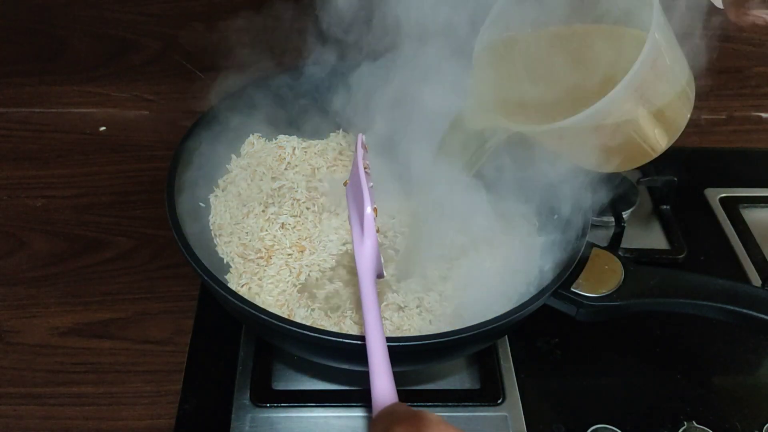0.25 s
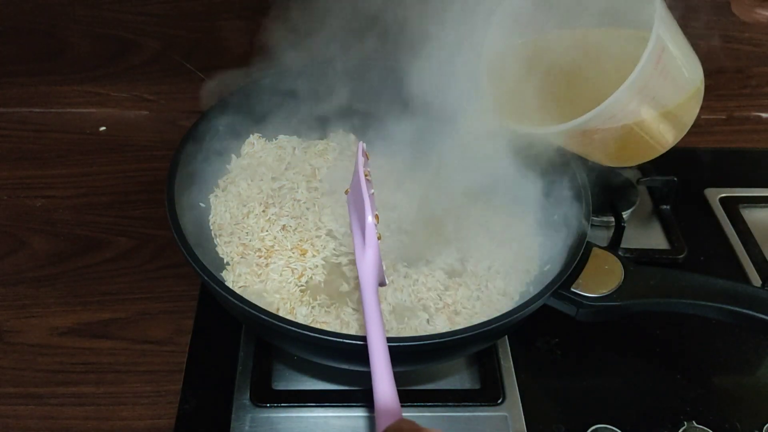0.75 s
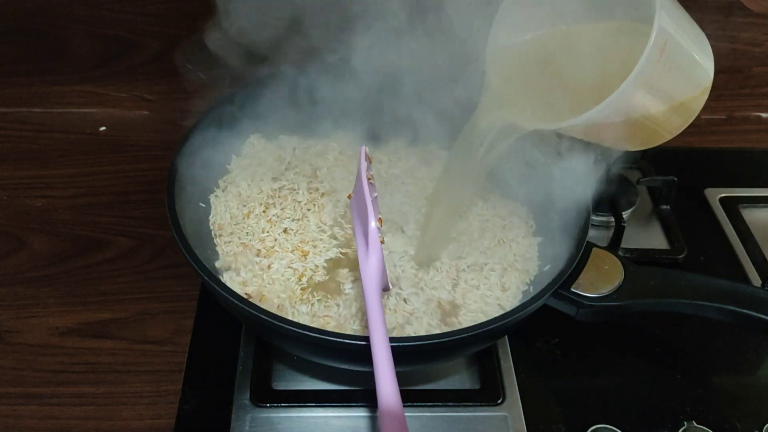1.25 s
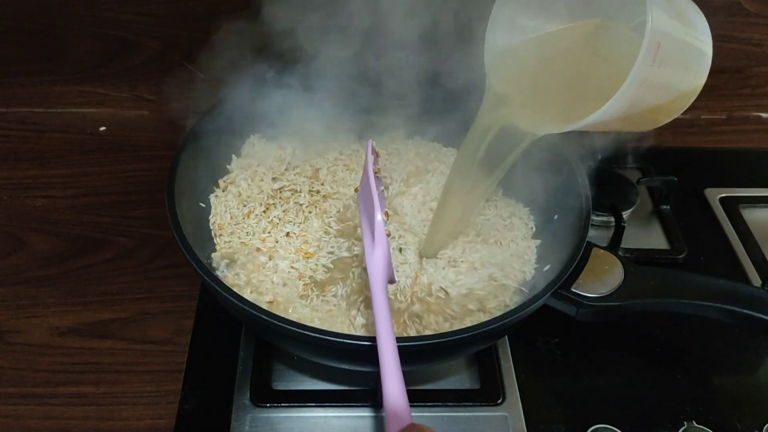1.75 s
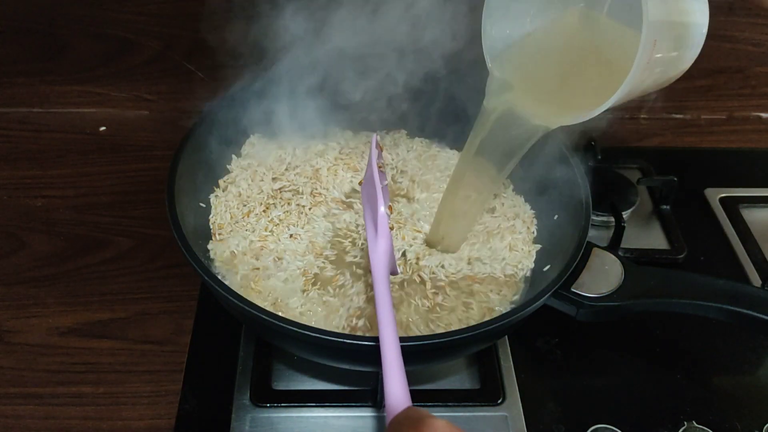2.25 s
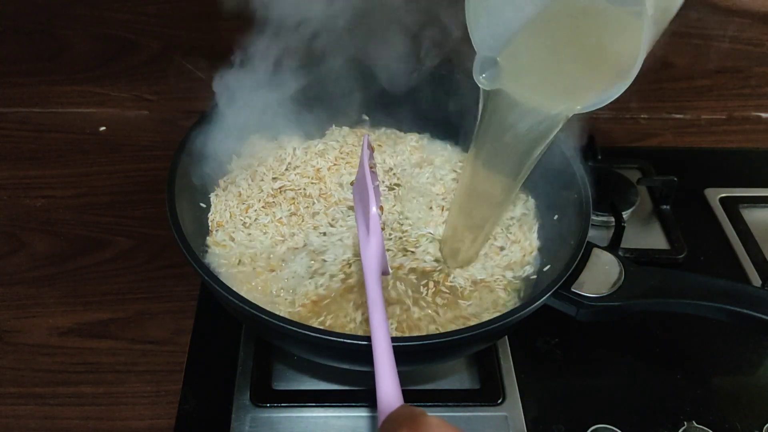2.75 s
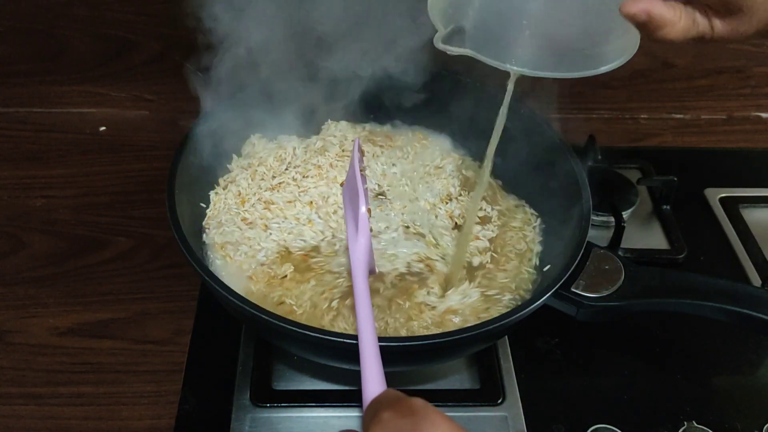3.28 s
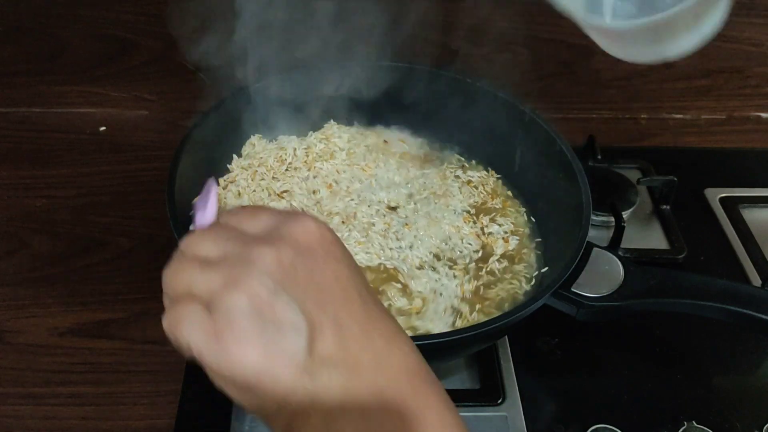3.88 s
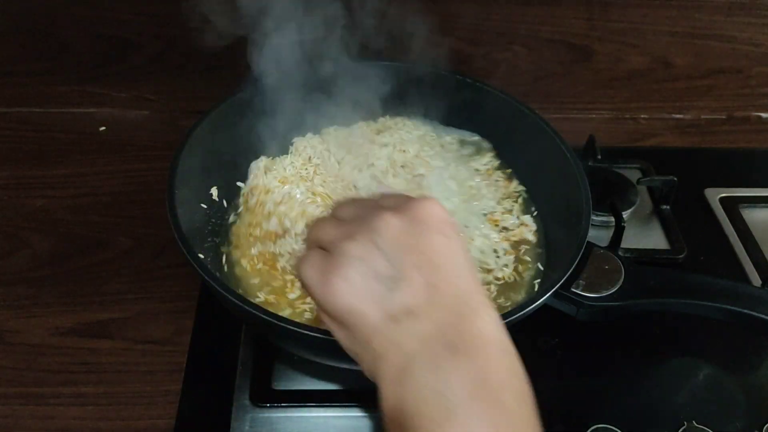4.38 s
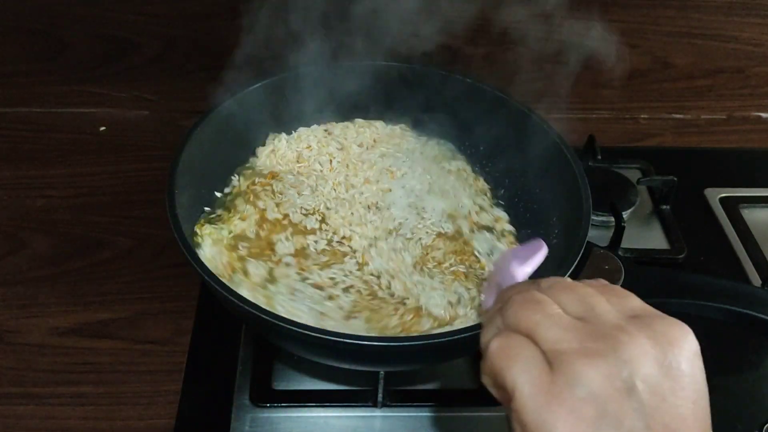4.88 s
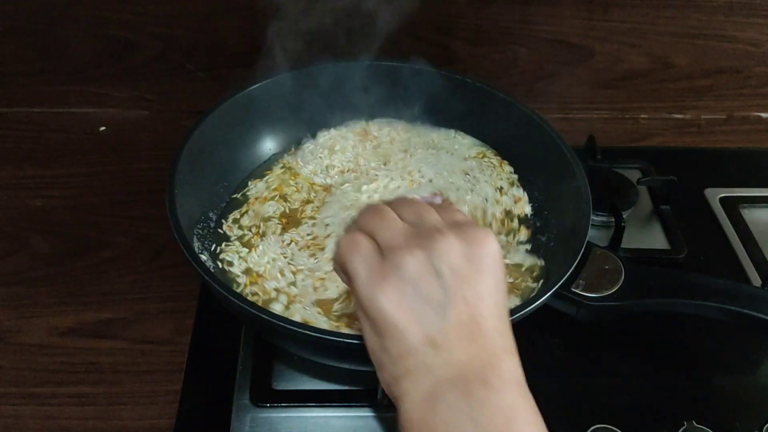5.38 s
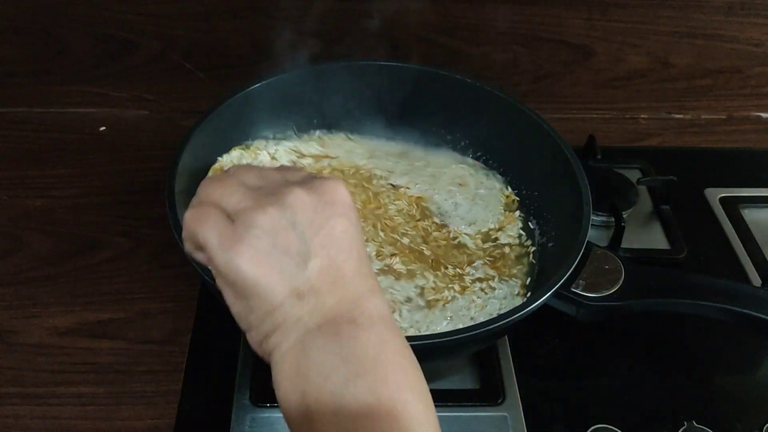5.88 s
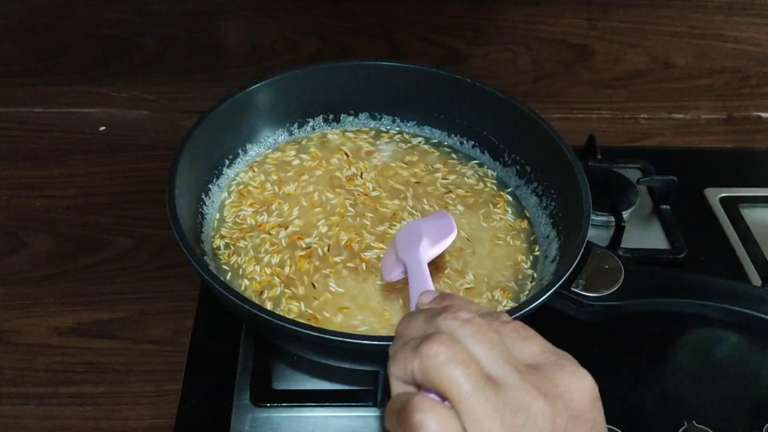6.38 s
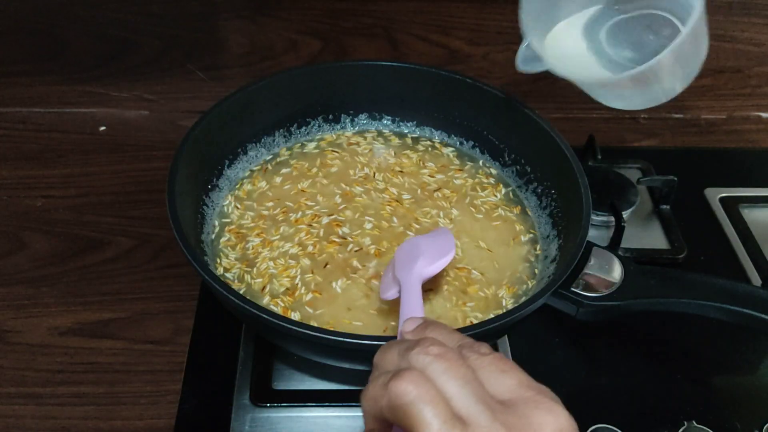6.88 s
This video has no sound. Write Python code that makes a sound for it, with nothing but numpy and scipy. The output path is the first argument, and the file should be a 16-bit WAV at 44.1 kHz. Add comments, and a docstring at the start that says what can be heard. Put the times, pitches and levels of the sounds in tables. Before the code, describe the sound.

Broth poured into a hot wok of rice hisses fiercely, thins to sharp spits and gurgles, then cuts abruptly to a quiet simmer.

```python
"""Broth runs into a hot wok of rice and oil: bursting steam bubbles, made of noise and crackle, ring the pan.
As the broth cools the metal, the hiss thins to single spits (short snaps of noise) and gurgles (rising tones).
Then time jumps to a quiet simmer: soft coloured noise with tiny ticks and a few pops.
A gas burner rumbles throughout, made of three narrow noises, with three soft low thuds.
One close microphone: both channels carry the same sound."""
import sys
import numpy as np
from scipy import signal
from scipy.fft import rfft, irfft
from scipy.io import wavfile
from scipy.ndimage import uniform_filter1d

SR = 44100
rng = np.random.default_rng(int(sys.argv[2]) if len(sys.argv) > 2 else 0)


def dump(signal):
    """Clip the signal to [-1, 1] and save it as 16-bit WAV at the path in sys.argv[1]."""
    limited = np.clip(np.atleast_2d(signal).T, -1, 1)
    pcm = np.round(limited * 32767).astype(np.int16)
    wavfile.write(sys.argv[1], SR, pcm)


N = 314433  # length in samples

# Strength of the sizzle over time: time_s, fine_fizz_db, coarse_over_fine_db
SIZZLE_LEVELS = [(0, -21.5, -2.5), (.7, -20.5, -4.5), (1.1, -22, -2.5), (1.6, -23.5, -3),
                 (3.0, -23.5, -1.5), (3.35, -25.5, 0.2), (4.1, -25, -2.5), (4.42, -24, -2),
                 (4.67, -24, -1.5), (4.85, -25.5, -1), (5.08, -24.5, -3), (5.2, -24, -4.5),
                 (5.5, -29.5, -2), (5.95, -30, -4), (6.08, -32.5, -2.5), (6.2, -33.5, -3.5), (6.3, -36, -1)]
# How deep the broth stands: time_s, depth (0 to 1)
BROTH_DEPTH = [(0, 0), (1.5, 0.1), (2.8, 0.25), (3.8, 0.43), (5, 0.73), (6.3, 1)]
# Colour of the bubbles through wok and microphone: pitch_hz, level_db (per Hz)
FIZZ_COLOUR = [(800, -28), (1250, -3), (1600, -2), (2300, -2.5), (2850, -0.6), (3200, -2.5), (3600, -8.5),
               (4500, -13.5), (5700, -13), (7100, -8), (9000, -6.5), (11050, -3.5), (11900, -7),
               (13400, -16.5), (15700, -23)]
# Ring of the nearly dry pan: pitch_hz, level_db (per Hz)
SHALLOW_PAN_COLOUR = [(120, -52), (200, -25), (322, -9.5), (398, -15), (438, -8), (466, 0), (512, -6.5),
                      (647, -2.5), (695, -6.5), (806, -8), (865, -13), (921, -10), (1030, -5.5),
                      (1200, -12.5), (1300, -8.5), (1690, -37), (2860, -120)]
# Body of the pan under broth: pitch_hz, level_db (per Hz)
DEEP_PAN_COLOUR = [(120, -54), (200, -15), (285, -11), (335, 4), (430, -5.5), (500, -4.5), (600, -2.5),
                   (648, -3), (695, -4.5), (730, 0.5), (860, -2.5), (920, -3.5), (1010, -2.5), (1280, -7.5),
                   (1700, -38), (2900, -100)]
# Pitches at which the wok rings: pitch_hz, width_hz, relative_level_db
WOK_MODES = [(270, 10, -9.5), (480, 9.4, -4), (660, 32, 5), (876, 12, 11), (1007, 33, 5.5), (1126, 35, 3.5),
             (1396, 15, 4.5), (1553, 32, 2.5), (1640, 25, 2), (1782, 61, 0.5), (1982, 47, 7),
             (2216, 50, 1.5), (2367, 46, 5), (2606, 61, -1), (2778, 50, 2.5), (2916, 34, -3),
             (3040, 46, -8.5)]
# Loud spits of oil and broth: start_s, level_db, coarse_over_fine_db
OIL_SPITS = [(3.6636, -12, -14), (3.797, -17, -5), (3.851, -12, -5), (4.611, -7.5, -10), (4.7704, -10, -17),
             (5.1726, -10, -15), (5.215, -15, -8), (5.284, -12, -14), (5.311, -15, -9), (5.417, -10, -13),
             (5.6526, -14, -13), (5.7513, -14, -13), (5.8345, -12, -9), (5.874, -15, -12),
             (5.8814, -10, -11), (5.898, -11, -13), (5.9273, -12, -16), (5.9754, -16, -11),
             (5.9894, -14, -21), (6.014, -18, -10), (6.1045, -18, -12), (6.1195, -9, -13),
             (6.1254, -18, -13), (6.1609, -16, -10), (6.1786, -19, -9), (6.1814, -18, -12),
             (6.1867, -16, -6), (6.1924, -16, -13), (6.2414, -20, -17), (6.2791, -20, -6),
             (6.2901, -17, -15), (6.3054, -19, -15), (6.351, -14, -8), (6.3536, -17, -18),
             (6.3633, -11, -24), (6.3646, -8, -10), (6.3660, -14, -24)]
# Gurgles under the spatula: start_s, start_pitch_hz, level_db, length_cycles
SPATULA_GURGLES = [(5.937, 575, -27, 16), (5.963, 660, -29.5, 14), (6.002, 820, -30, 14),
                   (6.012, 950, -35, 12), (6.088, 336, -37, 20), (6.125, 326, -36, 24)]
# Colour of the seething broth: pitch_hz, level_db (per Hz)
SIMMER_COLOUR = [(120, -30), (210, -22), (325, 2), (430, -9), (520, -10.5), (860, -11.5), (965, -10.5),
                 (1110, -13.5), (1900, -17), (2790, -19), (3300, -20), (4000, -29), (4900, -30),
                 (7000, -32.5), (10900, -29), (13000, -32), (15700, -38)]
# Pops of the simmer: start_s, level_db, coarse_over_fine_db, fade_s (time to fall 60 dB)
SIMMER_POPS = [(6.3904, -47, -10, .03), (6.4443, -41, -7, 0.065), (6.4921, -48, 0, .025),
               (6.6558, -47, -6, .05), (6.6754, -50, -11, .025), (6.7101, -41, -13, .04),
               (6.7224, -38, -13, 0.029), (6.757, -40, -11, .022), (6.8543, -53, -11, .03),
               (6.941, -32, -9, 0.022), (7.0265, -41, -14, 0.027), (7.0289, -37, 0, 0.1),
               (7.0813, -47, -6, .03), (7.1003, -49, -14, .02)]
# Rumble, drone and hum of the flame: pitch_hz, width_hz, level_db, wander_db, wanders_per_s
BURNER_PARTS = [(23, 21, -46, 2, 3.3), (66.4, 24, -56, 4, 4), (149.7, 28, -56, 2, 4)]
# Soft low thuds: start_s, start_pitch_hz, level_db, length_cycles
LOW_THUDS = [(.5, 77.5, -29, 7), (3.41, 68, -44, 10), (6.94, 67.6, -47, 22)]

JUMP_S = 6.3695  # when the hot wok gives way to the simmer
SPLIT_HZ = 4800  # border between coarse and fine fizz
# the pan's level at the hottest, and dB it loses for each dB the coarse fizz loses
PAN_DB, PAN_FOLLOWS = -33.5, 0.61
SNAP_RISE_S, SPIT_FADE_S = 0.00109, 0.013  # delay of each snap; time for a spit to fall 60 dB
SIMMER_DB = -55.5
# the hum sinks with the fizz by this share of its dB, and is weaker under the simmer
HUM_FOLLOWS, HUM_CALM_DB = 0.65, -9
DRONE_FULL_DB = 4  # gain of the drone under a full pan
TOP_HZ = 15750  # where the final treble cut begins


def sizzle():
    """Steam hiss and bursting bubbles take the fizz colour, while slower boiling rings the pan below."""
    fine_db, coarse_db = curves(SIZZLE_LEVELS)
    depth = np.clip(curves(BROTH_DEPTH)[0], 0, 1)
    total_db = fine_db + coarse_db
    pan_db = PAN_DB + PAN_FOLLOWS * (total_db - np.max(total_db))

    # the cooler the pan, the more the hiss breaks up into single bursts
    share = np.minimum(undb(-12.0 - 0.44 * (fine_db - fine_db.max())), 0.9)
    bursts = share * crackle(900.0, 8.7, 0.0085)
    hiss = np.sqrt(1 - share ** 2) * rng.standard_normal((2, N))
    steam = hiss[0] + bursts
    boil = hiss[1] + 0.3 * bursts

    fine, coarse = split(colour(steam, FIZZ_COLOUR))
    fine = unit(fine) * undb(0.19 * walk(12))
    coarse = unit(coarse + undb(-5.0) * ring(coarse, WOK_MODES))
    coarse = unit(coarse + undb(-14.0) * boiling())

    # shallow broth frees smaller bubbles, which brighten the upper edge
    coarse = coarse + 0.24 * (0.4 - depth) * ring(coarse, [(2880, 560, 0.0039)])
    # deep broth fills the lower treble and hollows the valley under it
    lower_treble = 0.4 * ring(fine, [(6460, 570, 0)])
    valley = 0.18 * ring(fine, [(4800, 1400, 0.0022)])
    fine = fine + (depth - 0.4) * (lower_treble - valley)
    coarse = coarse * undb(coarse_db + 0.55 * walk(9))

    boil = boil + undb(-6.0) * ring(boil, WOK_MODES)
    shallow = unit(colour(boil, SHALLOW_PAN_COLOUR, size=4096))
    deep = unit(colour(boil, DEEP_PAN_COLOUR, size=4096))
    pan = ((1 - depth) * shallow + depth * deep) * undb(pan_db + 1.3 * walk(15))
    return undb(fine_db) * (fine + coarse) + pan


def crackle(per_s, spread_db, fade_s):
    """Random bursting bubbles, mostly small, come in flurries; each leaves a short rustle."""
    flurry = undb(4.0 * walk(25))
    bursting = rng.random(N) < per_s * flurry / SR
    size = bursting * undb(spread_db * np.minimum(rng.exponential(size=N), 3.5))
    decay = np.exp(-np.log(1000) / (fade_s * SR))  # kept from one sample to the next
    tail = signal.lfilter([1], [1, -decay], size)
    clicks = size * np.sign(rng.standard_normal(N))
    return unit(clicks + 0.3 * tail * rng.standard_normal(N))


def boiling(count=1500):
    """Many ringing bubbles at random times sound across the middle pitches."""
    u = rng.random((count, 4)).T
    start_s = u[0] * N / SR
    pitch_hz = 1100 * 3.58 ** u[1]
    level_db = -3.0 * np.log(u[2] + 0.0095)
    cycles = 6 + 12 * u[3]
    return unit(bubbles(np.transpose([start_s, pitch_hz, level_db, cycles])))


def pops(table):
    """Each pop is a snap followed by a dying spatter of droplets."""
    t = np.arange(int(0.12 * SR)) / SR
    chance = rng.standard_normal((len(table), 2, len(t)))
    fine, coarse = np.zeros((2, N + len(t)))
    for (start_s, level_db, coarse_db, fade_s), (noise, drops) in zip(table, chance):
        spatter = noise * (0.11 + 0.35 * (drops > 2.0))  # a few droplets stand out
        burst = spatter * np.exp(-np.log(1000) * t / max(fade_s, 0.002))
        burst[0] = 1  # the snap
        i = int((start_s + SNAP_RISE_S) * SR)
        fine[i:i + len(t)] += undb(level_db) * burst
        coarse[i:i + len(t)] += undb(level_db + coarse_db) * burst

    # peaks of a bare click in each part, used to even out the levels
    fine_top, coarse_top = [np.abs(part).max() for part in split(response(FIZZ_COLOUR, 1024))]
    coarse = coarse + undb(-6.5) * ring(coarse, WOK_MODES)
    # the snap is a few quick cycles rather than one edge
    fine = 0.39 * fine + 0.98 * ring(fine, [(9500, 4900, 0)])
    fine_snaps = split(colour(fine, FIZZ_COLOUR))[0] / fine_top
    coarse_snaps = split(colour(coarse, FIZZ_COLOUR))[1] / coarse_top
    snaps = fine_snaps + coarse_snaps
    # snaps are hollow between their two bright bands
    return snaps - 0.38 * ring(snaps, [(5000, 830, 0.004)])


def bubbles(table, glide=0.29):
    """Fading tones: an air bubble's pitch rises as it nears the surface; a negative glide makes it fall."""
    out = np.zeros(N + SR)
    for start_s, pitch_hz, level_db, cycles in table:
        turns = np.arange(int(2 * cycles / pitch_hz * SR)) * pitch_hz / SR
        fade = np.exp(-3 * turns / cycles) * np.minimum(turns, 1)  # swells over the first cycle
        tone = np.sin(2 * np.pi * turns * (1 + glide * turns / cycles / 2))
        i = int(start_s * SR)
        out[i:i + len(turns)] += undb(level_db) * fade * tone
    return out[:N]


def simmer():
    """The broth seethes softly: coloured noise with tiny ticks."""
    seethe = rng.standard_normal(N) + 0.28 * crackle(120.0, 3.7, 0.012)
    return undb(SIMMER_DB + 1.0 * walk(8)) * unit(colour(seethe, SIMMER_COLOUR, size=4096))


def burner(before):
    """The gas flame rumbles, with a drone and a hum above; each is narrow noise wandering on its own."""
    parts = []
    for pitch_hz, width_hz, level_db, wander_db, rate in BURNER_PARTS:
        narrow = ring(rng.standard_normal(N), [(pitch_hz, width_hz, 0)])
        narrow = ring(narrow, [(pitch_hz, 1.44 * width_hz, 0)])
        parts.append(unit(narrow) * undb(level_db + wander_db * walk(rate)))
    rumble, drone, hum = parts
    fine_db = curves(SIZZLE_LEVELS)[0]
    hot_hum_db = HUM_FOLLOWS * (fine_db - fine_db.max())
    hum = hum * undb(before * hot_hum_db + (1 - before) * HUM_CALM_DB)
    drone = drone * undb(DRONE_FULL_DB * before * np.clip(curves(BROTH_DEPTH)[0], 0, 1))
    return rumble + drone + hum + bubbles(LOW_THUDS, glide=-0.064)


def ring(x, modes):
    """Resonances: each mode answers most strongly near its own pitch, as struck metal does."""
    out = 0
    for pitch_hz, width_hz, level_db in modes:
        peak = signal.iirpeak(pitch_hz, pitch_hz / width_hz, SR)
        out = out + undb(level_db) * signal.lfilter(*peak, x)
    return out


def split(x):
    """Fine (treble) and coarse (middle) parts."""
    return [signal.sosfilt(signal.butter(3, SPLIT_HZ, kind, fs=SR, output="sos"), x)
            for kind in ("high", "low")]


def colour(x, points, size=1024):
    """Shape a sound's balance of low and high pitches."""
    return signal.fftconvolve(x, response(points, size))[:N]


def response(points, size):
    """The answer to one click, with the colour of (Hz, dB) points and nothing before the click."""
    hz, db = np.transpose(points)
    grid = np.maximum(np.arange(size // 2 + 1) * SR / size, 1)
    # folding the cepstrum (spectrum of the log spectrum) puts the energy as early as possible
    cepstrum = irfft(np.interp(np.log(grid), np.log(hz), db) * np.log(10) / 20)
    cepstrum[1:size // 2] *= 2
    cepstrum[size // 2 + 1:] = 0
    return irfft(np.exp(rfft(cepstrum)))


def walk(rate):
    """Random wandering: levels held for 1 / rate seconds and smoothed twice, with a spread of 1."""
    hold = int(SR / rate)
    steps = np.repeat(rng.standard_normal(N // hold + 1), hold)
    return unit(uniform_filter1d(uniform_filter1d(steps, hold), hold)[:N])


def curves(table):
    """Draw straight lines between a table's points in time, one curve for each column."""
    time_s, *columns = np.transpose(table)
    return [np.interp(np.arange(N) / SR, time_s, column) for column in columns]


def undb(db):
    """Turn decibels into a plain multiplier."""
    return 10 ** (np.asarray(db) / 20)


def unit(x):
    """Scale a sound to an average (RMS) level of 1."""
    return x / np.sqrt(np.mean(x ** 2))


def scene():
    """The hot wok gives way to the simmer within a millisecond, over one continuous burner."""
    before = np.clip((JUMP_S - np.arange(N) / SR) / 0.001, 0, 1)
    spits = pops([(*row, SPIT_FADE_S) for row in OIL_SPITS])
    hot = sizzle() + spits + bubbles(SPATULA_GURGLES)
    calm = simmer() + pops(SIMMER_POPS)
    mono = before * hot + (1 - before) * calm + burner(before)
    return np.array([mono, mono])


def record(dry):
    """A steep filter removes the highest treble."""
    return signal.sosfilt(signal.ellip(10, 0.2, 80, TOP_HZ, fs=SR, output="sos"), dry)


dry = scene()
out = record(dry)
dump(out)
```